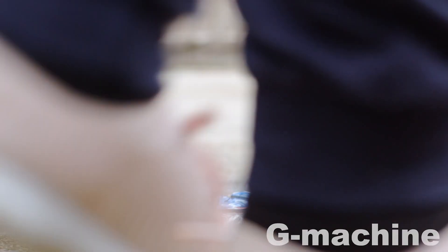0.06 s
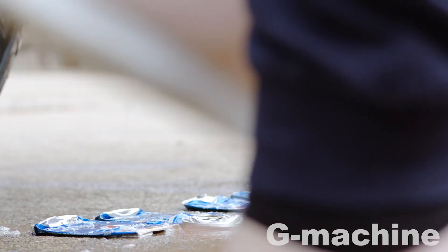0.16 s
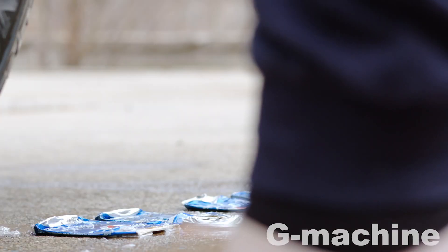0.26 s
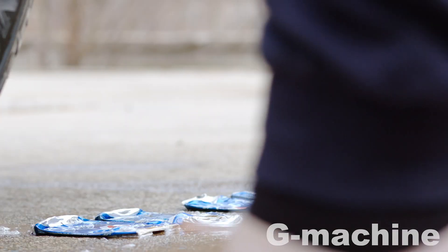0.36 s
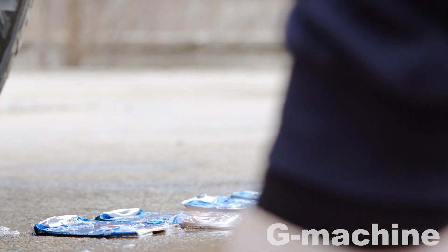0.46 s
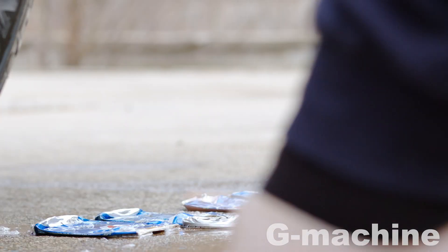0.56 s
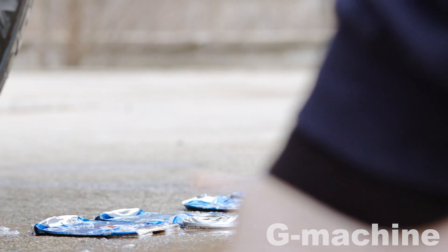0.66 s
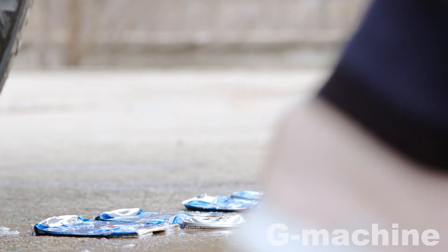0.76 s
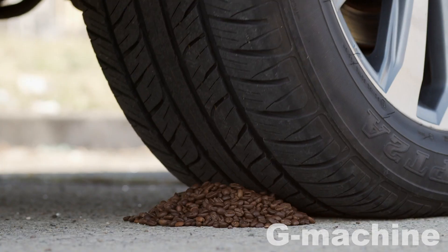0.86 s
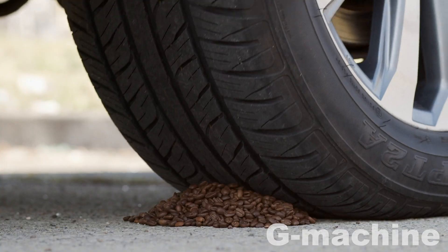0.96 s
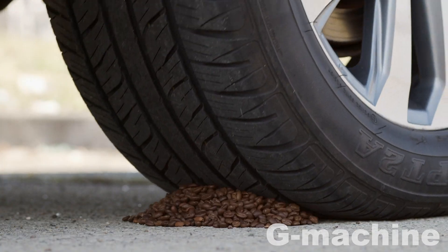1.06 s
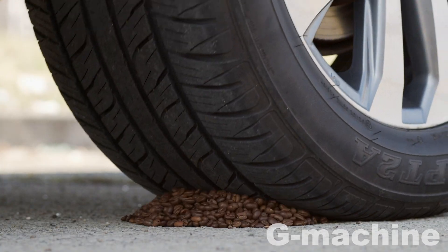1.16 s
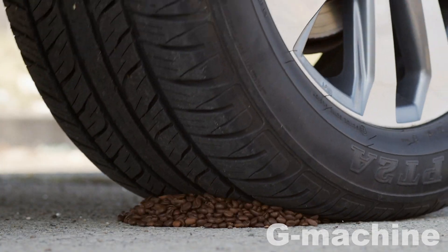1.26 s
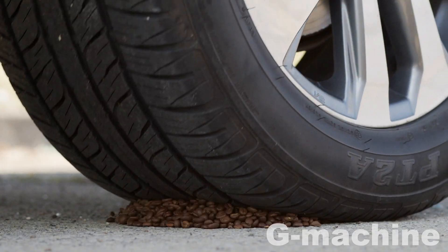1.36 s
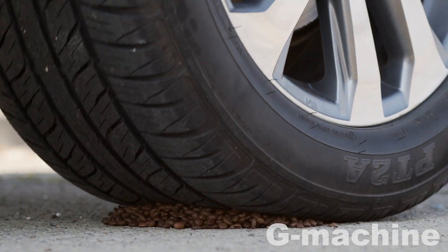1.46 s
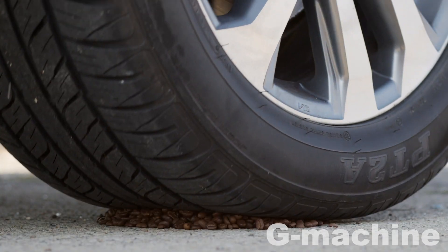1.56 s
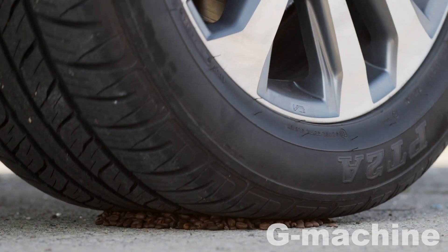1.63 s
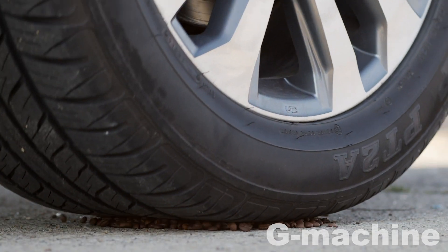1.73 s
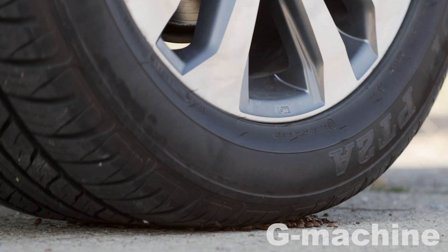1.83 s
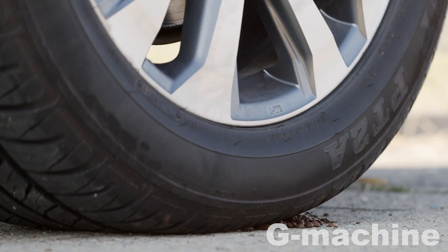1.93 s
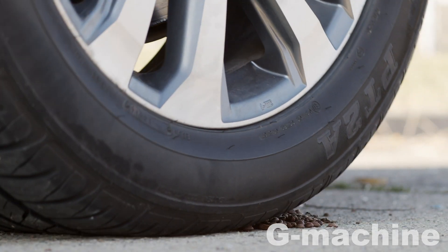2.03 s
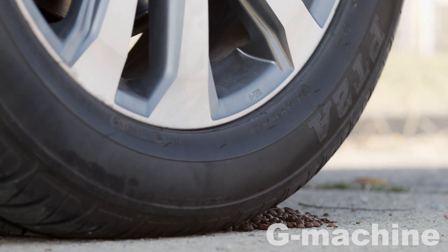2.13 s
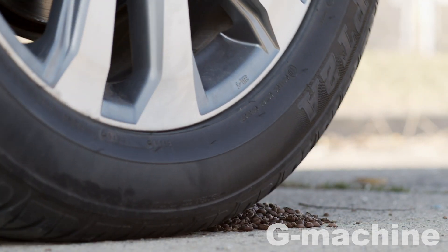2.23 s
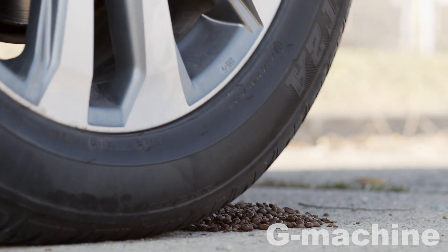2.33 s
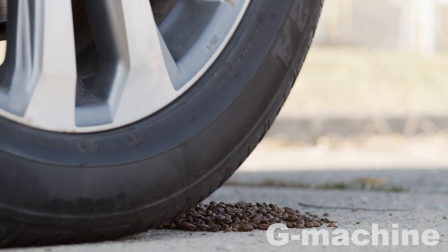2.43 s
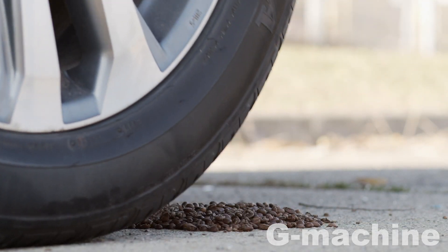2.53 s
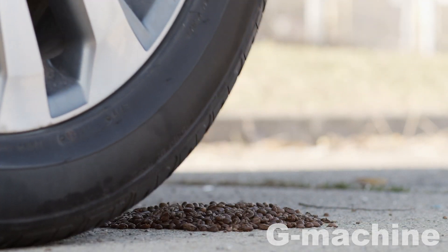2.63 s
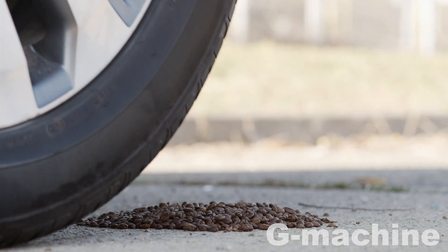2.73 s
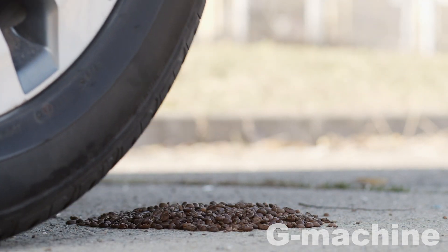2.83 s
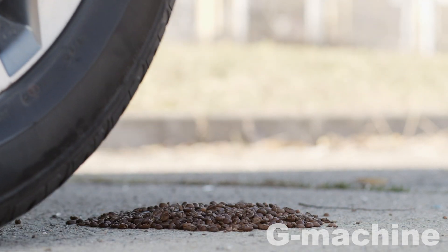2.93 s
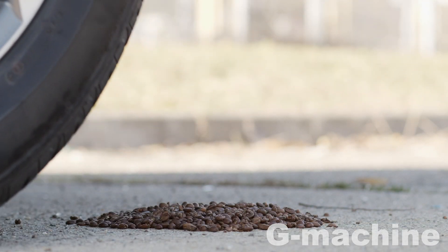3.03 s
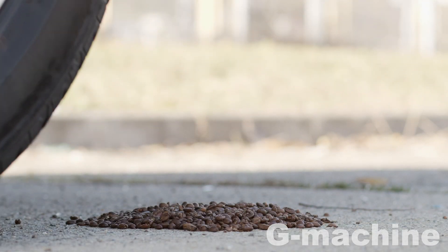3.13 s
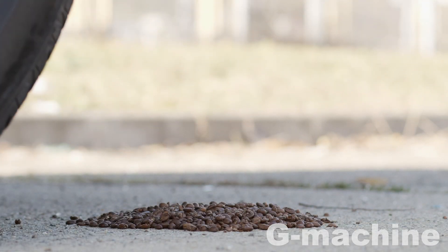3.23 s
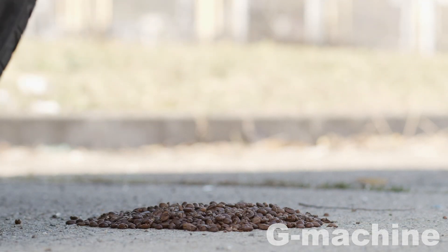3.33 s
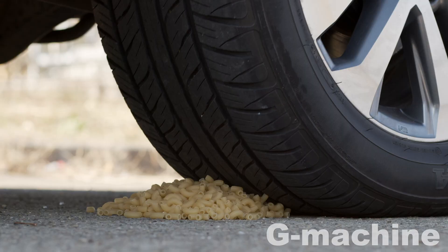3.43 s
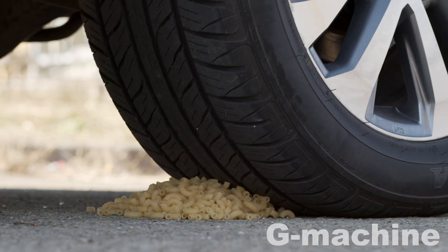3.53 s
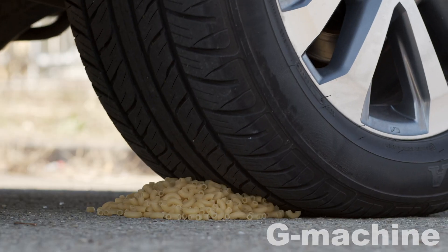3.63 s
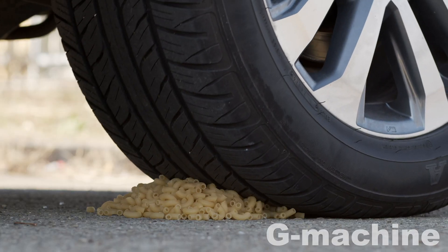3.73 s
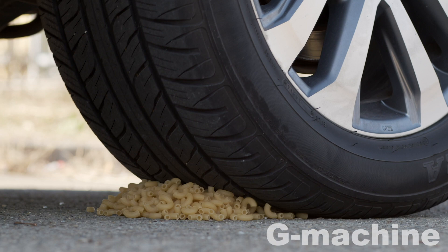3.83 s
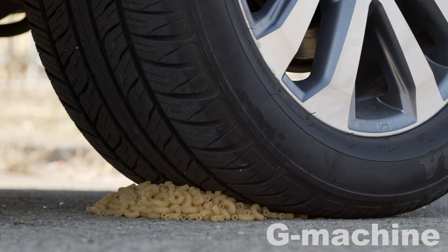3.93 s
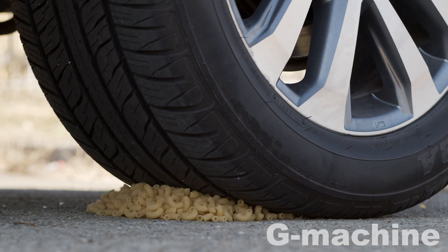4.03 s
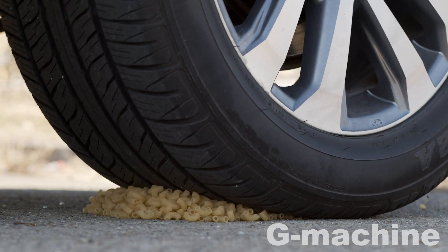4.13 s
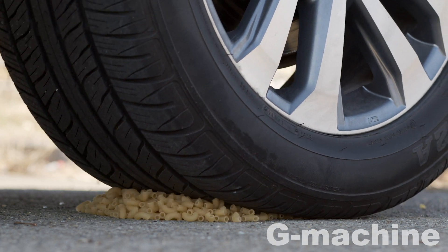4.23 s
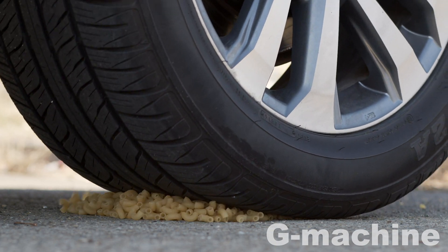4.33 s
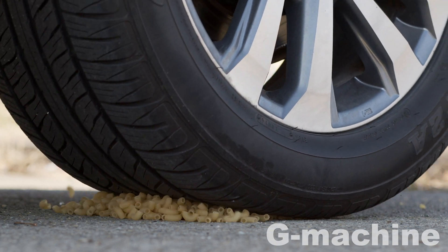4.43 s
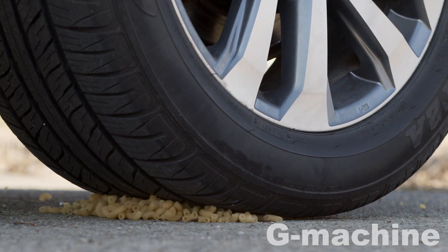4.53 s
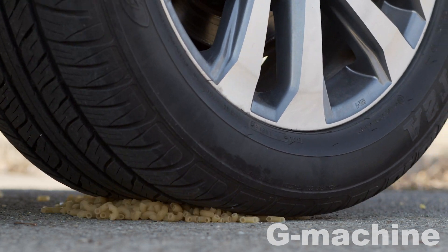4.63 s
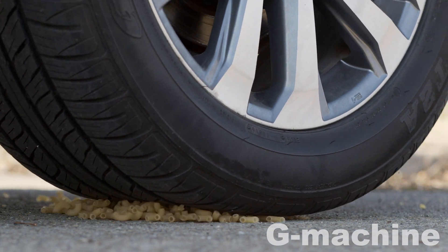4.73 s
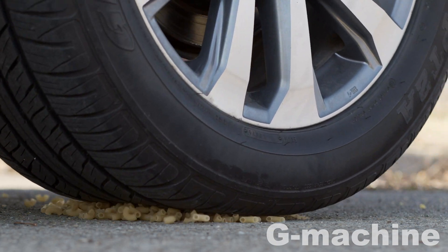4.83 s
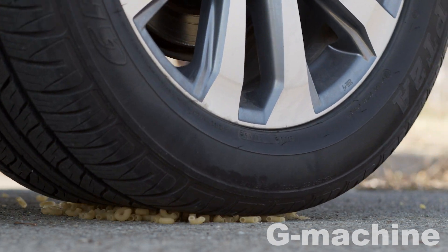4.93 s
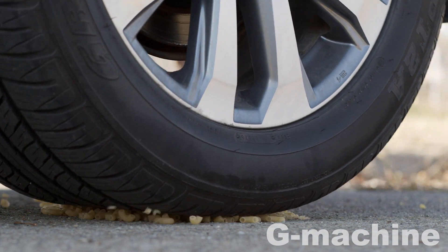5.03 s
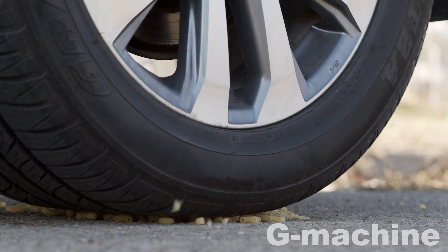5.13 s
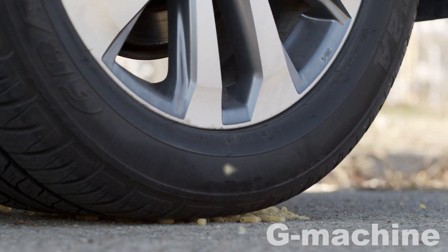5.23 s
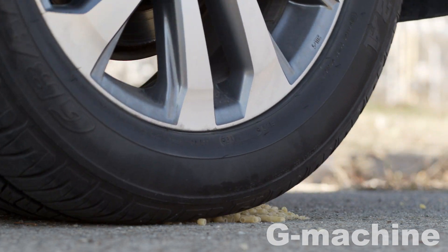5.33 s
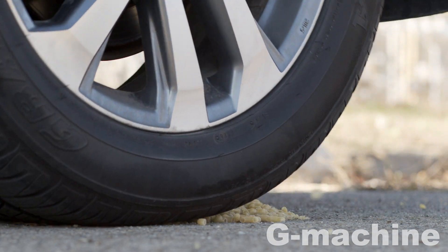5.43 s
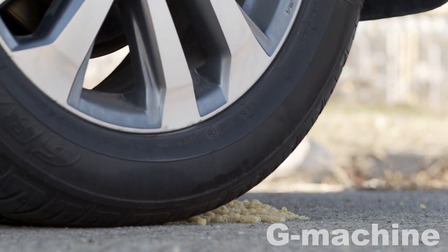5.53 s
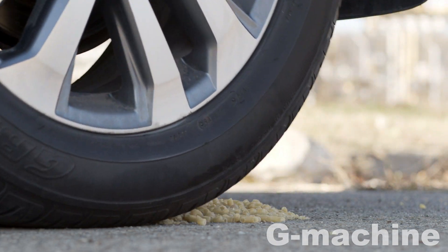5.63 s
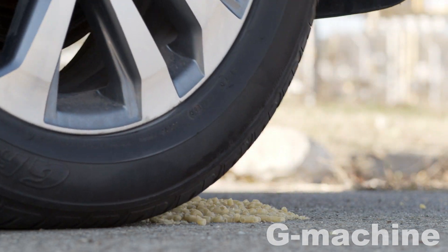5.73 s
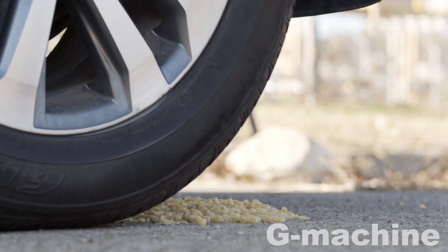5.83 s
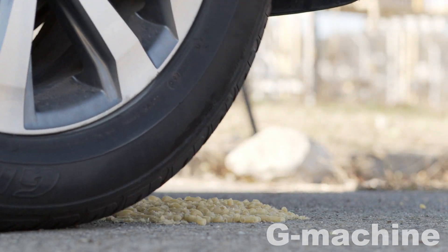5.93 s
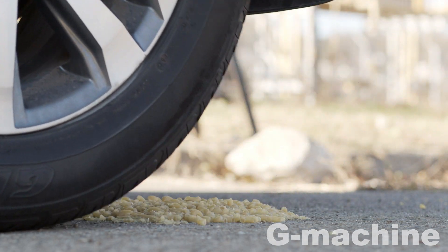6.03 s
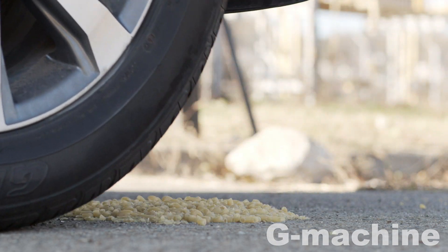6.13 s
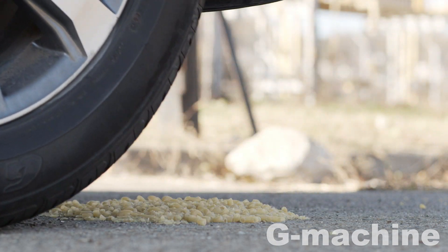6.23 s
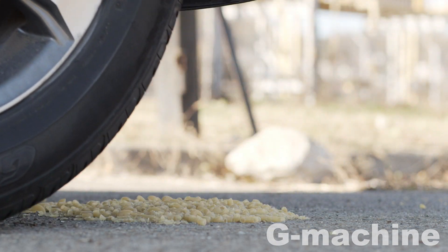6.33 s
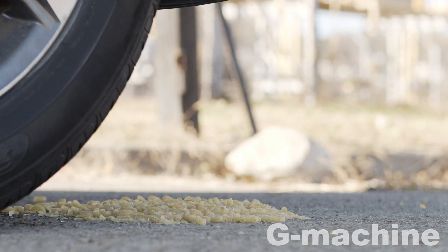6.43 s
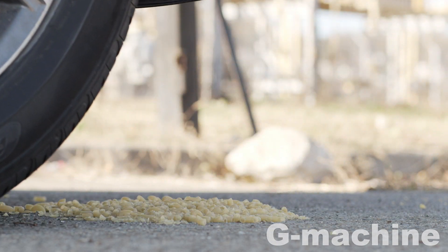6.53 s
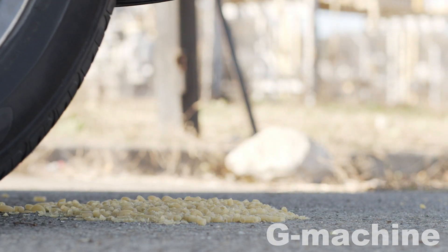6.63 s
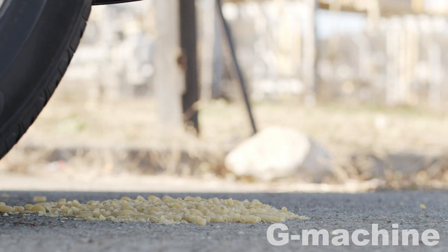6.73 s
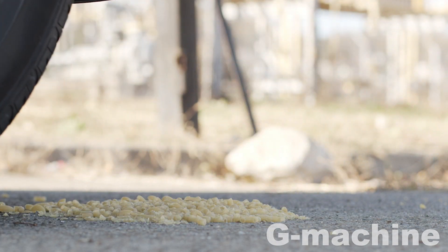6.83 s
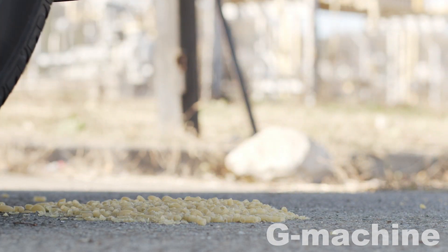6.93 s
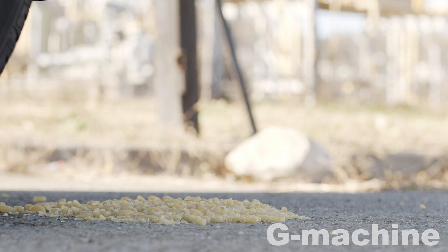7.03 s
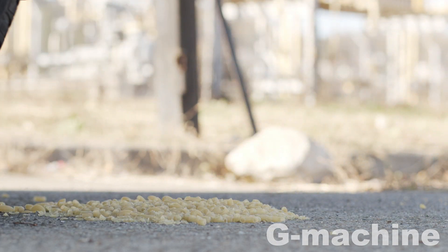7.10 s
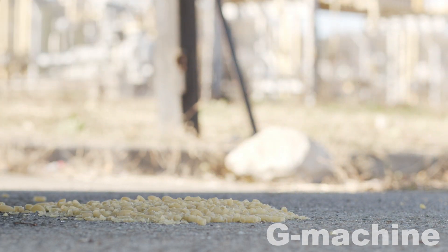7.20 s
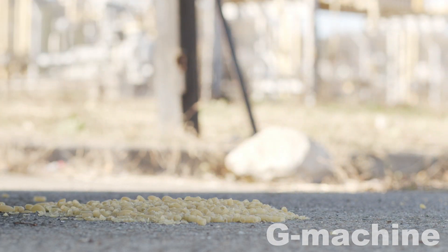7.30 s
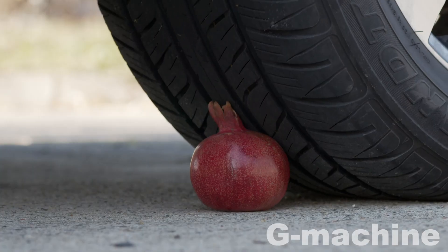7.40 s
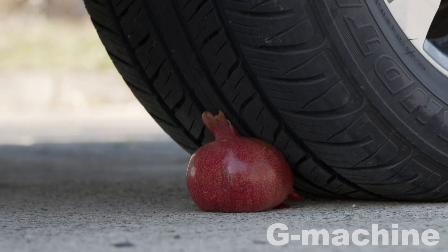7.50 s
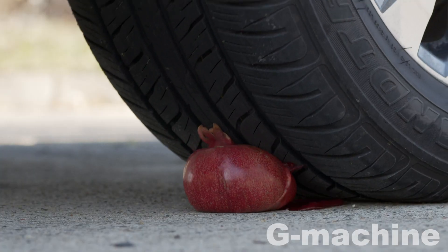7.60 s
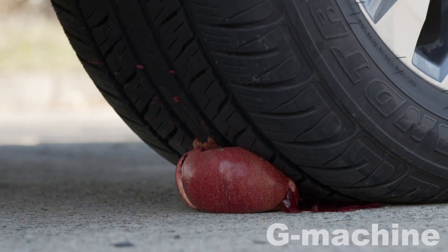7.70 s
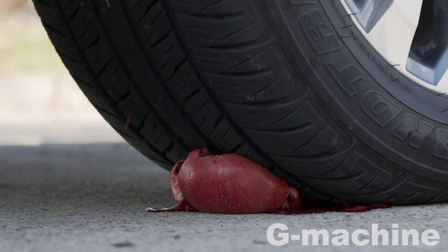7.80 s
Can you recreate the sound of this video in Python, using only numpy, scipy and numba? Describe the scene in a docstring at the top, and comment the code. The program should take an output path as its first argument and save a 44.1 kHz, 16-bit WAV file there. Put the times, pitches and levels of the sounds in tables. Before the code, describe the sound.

Outdoors, with the microphone on the pavement beside the tyre. A low engine throbs alone with a soft early bump, then cuts to sharp dry crackling as beans break under the tread. After a quiet stretch of engine and grit ticks, another cut brings louder, hollower pellet crunching. The engine then revs up, and a last cut starts a fruit splitting wetly with low thumps.

```python
"""Outdoors, at a microphone on the ground, a car creeps over a heap of dry beans, one of hard pellets and a fruit.
Each break is an impulse that rings the gap under the tread as damped sines, with noise bursts for the snap.
Random finer breaks crackle between; the fruit tears as noise modulated by random drops.
The engine sums sines at multiples of its firing rate, with resonant noise for its casing and valve tap.
Four shots are joined by hard cuts, where the engine jumps to a new speed."""
import sys
import numpy as np
from scipy import signal
from scipy.io import wavfile
from scipy.ndimage import uniform_filter1d
from numba import njit

SR = 44100
rng = np.random.default_rng(int(sys.argv[2]) if len(sys.argv) > 2 else 0)


def unload_audio(sound):
    """Save the sound as a 16-bit wav file, at the path given as the first command line argument."""
    columns = np.transpose(np.atleast_2d(sound))
    # keep every value between -1 and 1, then stretch to whole-number steps
    steps = np.round(np.clip(columns, -1, 1) * 32767)
    wavfile.write(sys.argv[1], SR, steps.astype(np.int16))


N = 346626
T = np.arange(N) / SR  # time in seconds


def undb(db):
    """Amplitude ratio: twenty decibels make a factor of ten."""
    return 10 ** (np.asarray(db) / 20)


def unit(x):
    """Normalisation to a root-mean-square of one."""
    return x / np.sqrt(np.mean(x ** 2))


def noise():
    """White noise: independent Gaussian samples, equal power at every frequency."""
    return rng.standard_normal(N)


def band(x, lo_hz, hi_hz):
    """Band-pass filtering: a Butterworth response, flat between its two edges."""
    sos = signal.butter(3, [lo_hz, min(hi_hz, .45 * SR)], "band", fs=SR, output="sos")
    return signal.sosfilt(sos, x)


def walk(rate):
    """Slow random modulation: levels held for 1 / rate seconds, then smoothed by two moving averages."""
    hold = int(SR / rate)
    steps = np.repeat(rng.standard_normal(N // hold + 1), hold)
    return uniform_filter1d(uniform_filter1d(steps, hold), hold)[:N]


@njit
def rings(n, start, size, hz, t60):
    """Damped free vibration: each blow starts a decaying sine that swells over its first quarter cycle."""
    y = np.zeros(n)
    for k in range(len(start)):
        step = np.exp(2j * np.pi * hz[k] / SR - np.log(1000.) / (t60[k] * SR))  # turn and decay per sample
        z, lack, fill = size[k] + 0j, 1., np.exp(-6 * hz[k] / SR)
        for i in range(start[k], min(n, start[k] + int(t60[k] * SR))):
            y[i] += z.imag * (1 - lack)
            z *= step
            lack *= fill
    return y


def bursts(start, size, t60, lo_hz, hi_hz):
    """Impulsive friction: each blow gives band noise a quick rise and an exponential decay."""
    blows = uniform_filter1d(np.bincount(start, size, N)[:N], size=25)
    envelope = signal.lfilter([1], [1, -np.exp(-np.log(1000) / (t60 * SR))], blows)
    return envelope * unit(band(noise(), lo_hz, hi_hz))


def resonant(modes):
    """Resonance: noise through two equal peak filters per mode, each wavering in level."""
    out = 0
    for hz, width_hz, db in modes:
        b, a = signal.iirpeak(hz, hz / width_hz / 1.7, SR)
        ringing = signal.lfilter(b, a, signal.lfilter(b, a, noise()))
        density = np.sqrt(width_hz / 100)  # a wider mode carries more power at the same dB
        out = out + undb(db + 1.2 * walk(7.6)) * density * unit(ringing)
    return out


# The shots. Each row: start in seconds, valve tap level in dB, treble hiss level in dB,
# outdoor hum in dB re its mean level, top ring of the tap in dB re its own level.
SHOTS = [(0, -69.5, -83.5, 1.5, -1.5), (.905, -93, -90, -1.5, -1.5), (3.52, -75, -93, -1.5, -9),
         (7.41, -76, -84, 2.5, -5)]


def shot_index():
    """Piecewise constancy: the number of the shot sounding at each sample."""
    return np.searchsorted(np.array(SHOTS)[:, 0], T, "right") - 1


def shot(column):
    """Step function: a value constant within each shot that jumps at the cuts."""
    return np.array(SHOTS)[shot_index(), column]


# Spectrum of the outdoor air. Each row: frequency in Hz, relative spectral density in dB per Hz.
AIR = [(8.8, -31), (15, 5), (43, -3.5), (113, -6), (204, -14.5), (298, -7.5), (449, -27.5), (657, -18),
       (907, -28), (1830, -37.5), (2120, -24), (3020, -38), (16500, -76.5)]
AIR_DB = -57.5  # mean level, to which each shot adds its own offset


def air():
    """Broadband ambience: outdoor hum and hiss summed from half-octave noise bands that waver separately."""
    hz_points, db_points = np.transpose(AIR)
    out = 0
    for hz in 20 * 2 ** np.arange(0, 9.6, .5):
        db = np.interp(np.log(hz), np.log(hz_points), db_points)
        out = out + undb(db + 1.95 * walk(5.3)) * band(noise(), hz / 1.18, hz * 1.167)
    return undb(AIR_DB + shot(column=3)) * unit(out)


def treble_hiss():
    """Band-limited noise: a faint, slowly wavering hiss."""
    return undb(shot(column=2) + walk(7.3)) * unit(band(noise(), 5300, 12500))


# Engine running. Each row: time in seconds, firing rate in Hz, exhaust reference level in dB,
# casing clatter level in dB.
ENGINE = [(0, 33.55, -49, -58.5), (.9, 33.83, -49.5, -59), (.91, 39.1, -61, -57.5),
          (1.31, 47.04, -62, -50.5), (1.9, 46.57, -58, -71), (2.4, 46.54, -55.5, -57.5),
          (3.51, 47.45, -53, -61), (3.525, 33.75, -59, -59), (5.8, 33.41, -54.5, -62),
          (6.37, 32.89, -54.5, -66.5), (6.69, 36.7, -54, -59.5), (6.85, 40.6, -50, -63),
          (7.0, 43.7, -51.5, -62), (7.19, 48, -57.5, -60.5), (7.4, 48.9, -56.5, -62),
          (7.415, 35.6, -67, -54), (7.86, 33.6, -63, -51.5)]
# A start of the eight-firing cycle in each shot, in seconds.
CYCLE_S = (.248, 2.976, 5.94, 7.5)


def engine():
    """Periodic excitation: exhaust, casing and valve tap all follow one count of the firings."""
    s, *columns = np.transpose(ENGINE)
    hz, exhaust_db, clatter_db = (np.interp(T, s, column) for column in columns)
    firings = np.cumsum(hz) / SR
    cycle_start = (np.array(CYCLE_S) * SR).astype(int)
    firings = firings - firings[cycle_start][shot_index()]
    return exhaust(firings, hz, exhaust_db) + casing(firings, clatter_db) + valve_tap(firings)


# Transfer of the exhaust pipe for the whole firing orders. Each row: frequency in Hz, gain in dB.
PIPE = [(50, -0.5), (67, -22), (86, -1.5), (95, -7.5), (102, -9), (116, -20), (132, -20), (141, -6)]
# Orders from uneven cylinders. Each row: multiple of the firing rate, level at idle and level when pulling,
# both in dB re the exhaust reference level.
UNEVEN = [(.25, -23, -17), (.5, 0, -17), (.75, -24, -5.5), (1.25, -15.5, -29), (1.5, -24, -24),
          (1.75, -24, -10), (2.25, -21, -26), (2.5, -11.5, -21), (3.25, -27, -16), (4, -18.5, -36),
          (4.25, -18, -49), (5, -19.5, -34)]
LUMP = .2  # fraction by which the whole orders swell once in eight firings


def exhaust(firings, hz, exhaust_db):
    """Fourier synthesis: sines at whole and fractional multiples of the firing rate, shaped by pipe and load."""
    def order(multiple, db, phase):
        level = np.sqrt(2) * undb(exhaust_db + db + 1.2 * walk(5.9))
        return level * np.sin(2 * np.pi * (multiple * firings + phase))

    pull = np.clip((hz - 35) / 10, 0, 1)  # idle at 35 Hz and below, full pull at 45 Hz
    even = -sum(order(m, np.interp(m * hz, *np.transpose(PIPE)), 0) for m in range(1, 4))
    uneven = sum(order(m, idle_db + pull * (pull_db - idle_db), rng.random())
                 for m, idle_db, pull_db in UNEVEN)
    return even * (1 + LUMP * np.cos(np.pi * firings / 4)) + uneven


# Casing modes. Each row: frequency in Hz, width in Hz, relative level in dB.
CASING = [(388, 72, -4.5), (682, 136, 0), (1162, 780, -12), (1860, 135, -8.5), (3000, 280, -20),
          (4850, 390, -28), (6570, 540, -35), (4500, 3100, -35.5)]


def casing(firings, clatter_db):
    """Amplitude modulation: resonant casing noise throbs once a firing."""
    throb = 1 + 0.17 * np.cos(2 * np.pi * firings)
    return undb(clatter_db) * unit(resonant(CASING) * throb)


# Rings of the valve tap, the top one first. Each row: frequency in Hz, width in Hz, relative level in dB.
VALVE = [(5000, 150, -2.5), (3030, 200, -1), (1835, 110, 5.5)]


def valve_tap(firings):
    """Periodic impact: resonant noise swells and decays once in eight firings."""
    since = firings / 8 % 1  # fraction of the cycle gone by
    tap = since / .06 * np.exp(1 - since / .06)
    valve = undb(shot(column=4)) * resonant(VALVE[:1]) + resonant(VALVE[1:])
    return undb(shot(column=1) + 0.6 * walk(3)) * tap * valve


# Ticks: grit off the tread, and lone small breaks heard only as a brief tick. # Each row: time in seconds,
# nominal treble level in dB, nominal mid level in dB.
TICKS = [(2.554, -48, -42), (2.637, -52, -46), (2.693, -62, -44), (2.7244, -56, -62), (2.7457, -52, -60),
         (2.767, -57, -62), (2.878, -60, -54), (3.276, -57, -58), (3.3218, -58, -60), (3.521, -41, -42),
         (5.7765, -58, -56), (5.82, -70, -54), (5.869, -70, -52), (6.528, -44, -52), (6.602, -47, -49),
         (6.6204, -53, -62), (6.646, -53, -62), (6.7313, -46, -58), (6.8451, -57, -66), (6.8774, -58, -58),
         (6.989, -53, -62), (7.265, -60, -66), (7.4115, -50, -58), (7.4208, -36, -50), (7.477, -40, -52),
         (7.517, -47, -46), (7.544, -42, -42), (7.594, -42, -48), (7.633, -44, -48)]


def ticks():
    """Micro-impact: grit off the tread and lone small breaks tick as brief noise bursts, bright or dull."""
    s, treble_db, mids_db = np.transpose(TICKS)
    start = (s * SR).astype(np.int64)
    treble = bursts(start, undb(treble_db - 8.0), 0.0074, 4200, 11000)
    return treble + bursts(start, undb(mids_db - 9.0), .011, 1300, 4800)


# The tyre drops as something gives way, or a soft bump nearby.
# Each row: time in seconds, nominal level in dB, frequency in Hz.
THUMPS = [(0.222, -34, 370), (0.225, -48, 900), (0.237, -33, 340), (1.279, -38, 149.5), (1.568, -40, 160),
          (1.946, -30.5, 109), (3.599, -30, 202), (3.88, -32, 191.8), (4.11, -39, 200), (4.629, -33, 195),
          (4.929, -36.5, 90), (5.219, -30, 200), (5.408, -34, 151), (7.565, -26, 90), (7.566, -33, 300),
          (7.721, -28.5, 87.6), (7.725, -35, 420)]


def thumps():
    """Low-frequency modal response: the tyre wall knocks as heavily damped sines."""
    s, db, hz = np.transpose(THUMPS)
    knocks = rings(N, (s * SR).astype(np.int64), undb(db - 0.5), hz, 5.3 / hz)
    return band(knocks, 44, 560)


# Tearing of the fruit. Each row: time in seconds, nominal level in dB, treble in dB re that level.
FRUIT = [(7.41, -69, -4), (7.474, -63, -3.5), (7.52, -54, -11), (7.598, -55, -7), (7.66, -54.5, -7),
         (7.72, -51.5, -4), (7.78, -58, -10), (7.86, -57, -10)]


def fruit():
    """Stochastic modulation: random juice drops break noise into the tiny bursts of dense wet tearing."""
    s, db, treble_db = np.transpose(FRUIT)
    drops = (rng.random(N) < 1500 / SR) * undb(-3.0 * np.log(rng.random(N) + 1e-9))  # 1500 a second
    spurts = 1.5 + unit(signal.lfilter([1], [1, -.985], drops))
    pulp = unit(spurts * band(noise(), 223, 2700) + .8 * band(noise(), 250, 800))
    bright = band(noise(), 2900, 7000) + 0.25 * band(noise(), 7000, 14000)
    spray = unit(spurts ** 2.1 * bright)
    level_db = np.interp(T, s, db, left=-140)  # as good as silent before the tear
    return undb(level_db + 4.0) * (pulp + undb(np.interp(T, s, treble_db)) * spray)


BEANS_END_S = 3.0  # breaks before this time are beans, later ones pellets


def breaking(s, ring_db, hz, snap_db, splinter_db):
    """Brittle fracture: a break rings the gap under the tread, clicks, snaps, spits splinters and rustles."""
    chance = rng.random((len(s), 7)).T
    bean = s < BEANS_END_S
    start = np.clip(((s + (chance[5] - 1.4) / 3000) * SR).astype(np.int64), 0, N - 1)
    cycles = np.where(bean, 4.5, 6) + 3 * chance[0]  # beans are smaller and ring shorter
    cycles = cycles + .5 * np.clip(ring_db - snap_db, -4, 10)  # a dull break rings longer than a sharp one
    noisy_db = np.where(bean, -7.0, 0.3)  # beans part cleanly, pellets crumble

    ring = rings(N, start, undb(ring_db + 2.5), hz, cycles / hz)
    gap = rings(N, start, undb(ring_db - 17), 640 * (1.0 + 0.276 * chance[1]), 0.074 + 0 * hz)
    knock_db = .5 * (ring_db + snap_db) + 1.5
    knock = rings(N, start, undb(knock_db), 950 * 1.69 ** chance[4], 0.007 + 0 * hz)
    # air inside the tyre
    cavity = rings(N, start, undb(ring_db - 26), 188 * (1 + 0.19 * chance[6]), 0.039 + 0 * hz)

    snap_t60 = np.where(bean, .6, 1) * (0.0049 + 0.005 * chance[3])
    snap = rings(N, start, undb(snap_db - 2.5 - 2.5 * bean), 1350 * 2.82 ** chance[2], snap_t60)
    snap = snap + bursts(start, undb(snap_db + noisy_db - 5.5), 0.0078, 990, 5080)
    splinters = bursts(start, undb(splinter_db + noisy_db - 6.5), 0.0079, 8300, 15000)

    # single impulses: the needle for beans only, the mid click for pellets only, the bright click for both
    needle = band(np.bincount(start, bean * undb(snap_db + 12.0), N), 670, 5540)
    needle = needle + band(np.bincount(start, bean * undb(splinter_db + 9.0), N), 12500, 16000)
    click = band(np.bincount(start, ~bean * undb(snap_db + 8.0), N), 1200, 5600)
    click = click + band(np.bincount(start, undb(splinter_db + 7.0), N), 6500, 15000)

    rustle = bursts(start, undb(snap_db - 27.5), 0.069, 670, 4200)
    rustle = rustle + bursts(start, undb(splinter_db - 25.5), 0.048, 6000, 16000)
    return band(ring + gap + knock, 354, 5300) + cavity + snap + needle + click + splinters + rustle


# How hard the tread grinds each heap, with pauses where the tyre hangs: one list for the beans, one for
# the pellets. Each row: time in seconds, grinding level in dB.
CRUMBS = [
    [(1.03, -60), (1.065, -51), (1.1, -43), (1.3, -39), (1.425, -35), (1.44, -52), (1.47, -45), (1.49, -39),
     (1.9, -38.5), (2.05, -34), (2.075, -49), (2.21, -46), (2.34, -66)],
    [(3.53, -53), (3.68, -37.5), (3.95, -36), (4.06, -43.5), (4.11, -32.5), (4.24, -33), (4.27, -45.5),
     (4.31, -40.5), (4.37, -36), (4.7, -33), (4.785, -35.5), (4.8, -47), (4.82, -44), (4.85, -36),
     (4.96, -30), (4.975, -48), (5.01, -44), (5.03, -45), (5.09, -40.5), (5.18, -28.5), (5.3, -34),
     (5.32, -41.5), (5.42, -30.5), (5.55, -41.5), (5.63, -57), (5.76, -56)],
]
# The heaps in the same order. Each row: snap in dB re the break level, splinters in dB re the break level,
# share of whole pieces that ring the higher tread mode.
HEAPS = [(1, -11, 0.44), (-3.5, -15, 0.24)]
# The lower and the higher tread mode, in Hz.
TREAD_HZ = (696, 1110)
CRUMB_RATE, CRUMB_SPREAD_DB = 500, 5  # fine breaks a second; scale of their random excess level
PIECE_RATE, PIECE_DB, PIECE_SPREAD_DB = 70, -3, 4.5  # whole pieces: the same, and dB re the grinding level


def crumbs():
    """Random point process: many fine crumbs and fewer whole pieces break at the grinding level."""
    out = 0
    for table, (snap_db, splinter_db, share) in zip(CRUMBS, HEAPS):
        s, level_db = np.transpose(table)
        span = s[-1] - s[0]

        fine = rng.random((int(CRUMB_RATE * span), 5)).T
        t = s[0] + span * fine[0]
        db = np.interp(t, s, level_db) - CRUMB_SPREAD_DB * np.log(1 - .97 * fine[1]) - 11.5
        fine_snap_db = db + snap_db + 8 * (fine[3] - .5)
        fine_splinter_db = db + splinter_db + 10 * (fine[4] - .5)
        out = out + breaking(t, db, 450 * 2.78 ** fine[2], fine_snap_db, fine_splinter_db)

        whole = rng.random((int(PIECE_RATE * span), 6)).T
        t = s[0] + span * whole[0]
        db = np.interp(t, s, level_db) + PIECE_DB - PIECE_SPREAD_DB * np.log(1 - .9 * whole[1])
        mode_hz = np.where(whole[2] < share, TREAD_HZ[1], TREAD_HZ[0])
        hz = mode_hz * (1 + 0.1 * (whole[5] - .5))
        whole_snap_db = db + snap_db + 16 * (whole[3] - .5)
        whole_splinter_db = db + splinter_db + 22 * (whole[4] - .5)
        out = out + breaking(t, db, hz, whole_snap_db, whole_splinter_db)
    return out


# Loud or lone cracks. Each row: time in seconds, nominal ring level in dB, ring frequency in Hz,
# nominal snap level in dB, nominal splinter level in dB.
CRACKS = [(1.0691, -35, 700, -29, -51), (1.0776, -20.5, 665, -23.5, -32.5), (1.133, -28, 1020, -24.5, -42),
          (1.158, -23.5, 690, -21.5, -38), (1.1657, -36, 1060, -27, -38), (1.1738, -36, 660, -31, -33),
          (1.1858, -25.5, 566, -23.5, -39), (1.1914, -32, 700, -26, -49), (1.2032, -36, 740, -32, -44),
          (1.2106, -35, 650, -33, -32), (1.2178, -35, 600, -32, -51), (1.226, -29, 1140, -33, -43),
          (1.2345, -31, 620, -21, -30), (1.248, -28.5, 710, -20, -31), (1.2578, -24, 730, -27, -43),
          (1.2666, -26, 740, -22, -44), (1.2768, -17, 423, -15, -23), (1.2948, -28, 740, -25, -38),
          (1.302, -23.5, 700, -21, -39), (1.3495, -26, 654, -18, -38), (1.3549, -28, 740, -28, -40),
          (1.3629, -35, 550, -30, -26), (1.3763, -31, 650, -25, -33), (1.3853, -29, 765, -17.5, -38),
          (1.3994, -20.5, 550, -18, -25), (1.4042, -38, 1280, -19, -39), (1.418, -28, 690, -27, -54),
          (1.4252, -27, 683, -19, -34), (1.4898, -32, 1180, -23, -43), (1.4997, -30, 1150, -26.5, -25),
          (1.5184, -33, 1170, -29, -39), (1.5227, -33, 1000, -31, -37), (1.5279, -31, 1200, -31, -31),
          (1.5485, -24, 1280, -29, -29), (1.5659, -24, 755, -33, -53), (1.5711, -18.5, 484, -17.5, -23),
          (1.5915, -31, 590, -25, -29), (1.6132, -23.5, 640, -24, -30), (1.6258, -33, 640, -25, -39),
          (1.6403, -24.5, 624, -22, -57), (1.6474, -32, 810, -27, -47), (1.6629, -28.5, 1200, -34, -36),
          (1.673, -41, 700, -26, -36), (1.6781, -35, 1210, -26, -39), (1.6866, -35, 590, -27, -42),
          (1.7135, -32, 690, -26, -32), (1.7232, -28, 1260, -19.5, -49), (1.748, -36, 730, -26, -43),
          (1.7589, -24, 1500, -19.5, -28), (1.7653, -29, 620, -27, -27), (1.7724, -29, 670, -23, -30),
          (1.781, -29, 620, -18, -23), (1.7855, -23.5, 720, -22, -29), (1.7998, -28, 650, -21, -52),
          (1.8175, -39, 780, -26, -59), (1.8312, -27, 1210, -31, -33), (1.838, -26.5, 1200, -17, -26),
          (1.8574, -44, 1280, -27, -50), (1.8673, -19.5, 710, -19.5, -50), (1.8715, -28, 650, -26, -38),
          (1.889, -25, 1290, -28, -33), (1.8958, -47, 800, -31, -40), (1.9058, -27, 740, -31, -34),
          (1.9153, -35, 640, -25, -25), (1.9277, -32, 1300, -28, -46), (1.9354, -25, 670, -26, -44),
          (1.9441, -17, 560, -20, -21), (1.9506, -24, 700, -18.5, -37), (1.9653, -28, 670, -23.5, -45),
          (1.9818, -34, 680, -24, -43), (1.9871, -28, 730, -31, -33), (1.9926, -15.5, 665, -18.5, -24),
          (1.9974, -40, 440, -30, -37), (2.0056, -28, 1170, -23, -30), (2.0127, -22, 640, -19, -33),
          (2.0172, -35, 740, -29, -44), (2.025, -21, 596, -19.5, -41), (2.0335, -26.5, 530, -23.5, -22.5),
          (2.043, -29, 1100, -32, -32), (2.0494, -31.5, 690, -36, -47), (2.0586, -38, 680, -32, -47),
          (2.103, -44, 1270, -34, -55), (2.1246, -44, 800, -31, -47), (2.134, -45, 650, -39, -52),
          (2.142, -51, 1380, -43, -40), (2.1485, -40, 620, -37, -42), (2.1545, -46, 580, -36, -57),
          (2.1661, -41, 1310, -34, -47), (2.172, -34, 650, -28, -55), (2.1831, -32, 1090, -24.5, -38),
          (2.1888, -22.5, 620, -21, -38), (2.1959, -34, 600, -30, -54), (2.2089, -43, 620, -32, -43),
          (2.2203, -52, 700, -37, -55), (2.2346, -42, 680, -37, -48), (2.2435, -23.5, 784, -18.5, -44),
          (2.2723, -51, 450, -36, -52), (2.2899, -51, 1340, -41, -48), (2.2964, -17.5, 740, -23, -48),
          (2.3097, -43, 700, -24, -38), (2.3249, -38.5, 710, -38, -58), (2.5628, -48, 760, -37, -54),
          (3.5343, -56, 730, -37.5, -52), (3.5615, -24, 403, -26.5, -34), (3.5711, -21.5, 595, -24.5, -37),
          (3.61, -22, 590, -20, -28.5), (3.6287, -24, 770, -26.5, -43), (3.6603, -23, 610, -26, -35),
          (3.6745, -31, 780, -26, -42), (3.6835, -30, 740, -29, -52), (3.6914, -12, 660, -16, -28),
          (3.6972, -39, 610, -27, -45), (3.7103, -22.5, 850, -23, -49), (3.7176, -14, 770, -22, -40),
          (3.7666, -11, 744, -16.5, -32), (3.7976, -18, 740, -20, -39), (3.8349, -17, 674, -18, -21),
          (3.8518, -30, 740, -23, -41), (3.884, -11.5, 730, -16.5, -26), (3.8916, -11.5, 720, -17.5, -20),
          (3.913, -23, 740, -30, -43), (3.9277, -17.5, 676, -19, -24.5), (3.9362, -26, 860, -26, -45),
          (3.9664, -25, 1210, -25, -32), (4.0042, -20.5, 670, -22, -32), (4.0194, -17.5, 666, -18.5, -35),
          (4.088, -19, 624, -28.5, -41), (4.1043, -12.5, 560, -20.5, -21.5), (4.1169, -24, 776, -21, -47),
          (4.1269, -12, 595, -17.5, -26), (4.1577, -22, 644, -22, -46), (4.1639, -29, 590, -25, -35),
          (4.1908, -18, 714, -22.5, -34), (4.2029, -26, 676, -27, -22), (4.212, -29, 580, -32, -34),
          (4.2422, -23.5, 540, -28.5, -21.5), (4.318, -31, 1110, -29, -34), (4.338, -32, 1120, -30, -52),
          (4.3565, -21, 600, -31, -40), (4.3655, -18.5, 1130, -16, -32), (4.3706, -20, 590, -17.5, -22),
          (4.3787, -17.5, 580, -18.5, -25), (4.3875, -23, 640, -23, -45), (4.4009, -22, 565, -19, -47),
          (4.4088, -26, 680, -20.5, -47), (4.4148, -26.5, 590, -28, -35), (4.428, -36, 550, -35, -30),
          (4.434, -21, 560, -20.5, -28), (4.4405, -28, 670, -21, -43), (4.4641, -23.5, 820, -28, -52),
          (4.4737, -23.5, 614, -28, -52), (4.4865, -19, 600, -21, -42), (4.4907, -33, 603, -30, -39),
          (4.5001, -22.5, 530, -21, -27), (4.5244, -26, 710, -21, -43), (4.5349, -29, 620, -27, -51),
          (4.5603, -25.5, 604, -30, -56), (4.5853, -27, 570, -24, -28), (4.591, -22.5, 590, -27, -35),
          (4.5994, -26, 730, -26, -40), (4.6057, -28, 470, -26, -42), (4.614, -19, 950, -29, -40),
          (4.6191, -28, 940, -23, -26), (4.6248, -20, 960, -19, -26), (4.6294, -17.5, 650, -16, -19),
          (4.6396, -35, 870, -33, -42), (4.6466, -28, 750, -31, -44), (4.6605, -25, 610, -25, -45),
          (4.6676, -27, 560, -28, -38), (4.679, -14, 615, -22, -46), (4.6863, -21, 604, -28, -47),
          (4.6941, -22, 680, -25, -29), (4.7256, -27, 820, -29, -44), (4.7466, -27, 680, -29, -44),
          (4.752, -27, 586, -25.5, -37), (4.7695, -26.5, 650, -25, -33), (4.782, -27.5, 560, -27, -29),
          (4.8283, -26, 740, -25, -30), (4.8455, -20.5, 634, -21, -21), (4.8535, -29, 1070, -27, -40),
          (4.8677, -26, 580, -30, -32), (4.8865, -30, 580, -20, -21), (4.8972, -20.5, 557, -22, -28),
          (4.908, -24, 1000, -25, -33), (4.917, -30, 660, -30, -51), (4.9295, -25, 1020, -27, -32),
          (4.9401, -28, 890, -18.5, -27), (4.9586, -26, 640, -25, -50), (5.0199, -20, 610, -26, -33),
          (5.036, -26, 590, -30, -24.5), (5.0496, -20.5, 600, -27, -39), (5.0654, -23, 590, -23.5, -27),
          (5.1117, -31, 600, -29, -38), (5.1184, -31.5, 640, -34, -34), (5.124, -21, 610, -24, -38),
          (5.1291, -19.5, 910, -21, -28), (5.1549, -19.5, 620, -26, -32), (5.17, -26, 640, -24, -32),
          (5.176, -17.5, 1190, -19, -33), (5.1824, -17, 750, -17, -29), (5.187, -15, 705, -14, -40),
          (5.201, -34, 1060, -28, -46), (5.216, -20, 620, -28, -39), (5.2272, -18, 607, -23, -45),
          (5.2388, -14.5, 620, -23, -38), (5.2452, -20, 566, -20, -34), (5.2493, -22, 650, -29, -35),
          (5.2561, -30, 690, -30, -49), (5.2625, -19.5, 615, -28, -44), (5.2772, -24, 656, -32, -39),
          (5.2823, -28, 597, -24, -49), (5.2919, -20, 730, -28, -48), (5.2966, -15, 596, -20, -16.5),
          (5.307, -23, 604, -28, -39), (5.3419, -27, 670, -27.5, -53), (5.3493, -29, 650, -29, -36),
          (5.3911, -21, 534, -20.5, -23), (5.4024, -27.5, 660, -29, -47), (5.4088, -10.5, 605, -13.5, -19),
          (5.4183, -23.5, 600, -31, -38), (5.428, -29, 610, -33, -54), (5.4414, -22, 1170, -27, -41),
          (5.4523, -18.5, 565, -22.5, -29), (5.4593, -8, 632, -26, -39), (5.4745, -38, 600, -31, -33),
          (5.4957, -22, 593, -27, -44), (5.5054, -21, 630, -23.5, -42), (5.515, -21, 1160, -32, -48),
          (5.5241, -24, 620, -28.5, -44), (5.5356, -21, 634, -21, -54), (5.542, -26, 700, -29, -54),
          (5.5655, -28, 616, -30.5, -54), (5.6015, -20.5, 760, -28, -55), (5.6689, -39, 700, -39, -47),
          (5.6839, -41, 566, -41, -49), (5.7026, -46, 580, -33, -59), (5.728, -32.5, 714, -36, -61),
          (5.7346, -37, 725, -43, -76), (5.7452, -37, 700, -39, -62), (6.5384, -35.5, 624, -36, -31),
          (6.6602, -50, 620, -44, -41), (6.684, -39, 1040, -34, -35), (6.7024, -48, 1120, -43, -39),
          (6.7828, -49, 414, -45.5, -42), (7.4208, -41, 750, -35, -48), (7.5652, -24.5, 630, -25, -35.5),
          (7.5745, -37, 1130, -33, -54), (7.6056, -39, 700, -37, -51), (7.7132, -39, 660, -39, -45),
          (7.7194, -42, 410, -35, -47), (7.7382, -34, 680, -35, -44), (7.8475, -46, 960, -36.5, -39.5)]


def cracks():
    """Fracture propagation: two weaker breaks crowd round each crack, most of them just after it."""
    s, ring_db, hz, snap_db, splinter_db = np.transpose(CRACKS)
    chance = rng.random((len(s), 2, 4)).T
    early = chance[1] < .2
    lag = -.004 * np.log(1 - chance[0]) * np.where(early, -1, 1)  # 4 ms on average, before or after
    drop_db = 12 + 9 * chance[2] + 6 * early
    spread = (s + lag, ring_db - drop_db + 6.5, hz * 2.0 ** (chance[3] - .3),
              snap_db - drop_db, splinter_db - drop_db)
    main = breaking(s, ring_db, hz, snap_db, splinter_db)
    return main + breaking(*(column.ravel() for column in spread))


def scene():
    """Superposition: the pressures of all sources add, from the background to the cracks."""
    background = air() + treble_hiss() + engine()
    return (background + ticks() + thumps() + fruit() + crumbs() + cracks())[None]


TOP_HZ = 16600  # upper edge of the pass band


def record(dry):
    """Low-pass filtering: the recorder cuts the top with a steep elliptic response."""
    return signal.sosfilt(signal.ellip(10, .2, 80, TOP_HZ, fs=SR, output="sos"), dry)


dry = scene()
out = record(dry)
unload_audio(out)
```